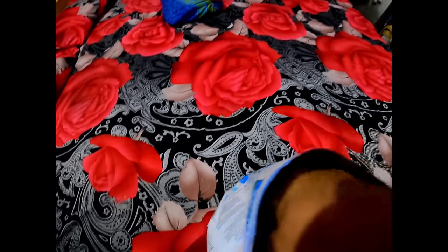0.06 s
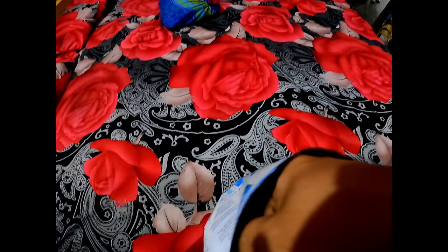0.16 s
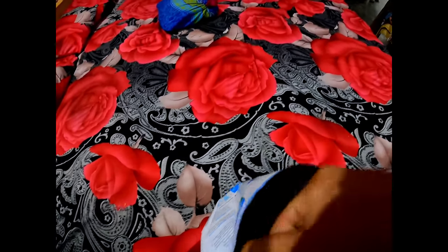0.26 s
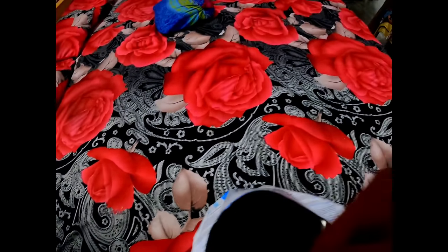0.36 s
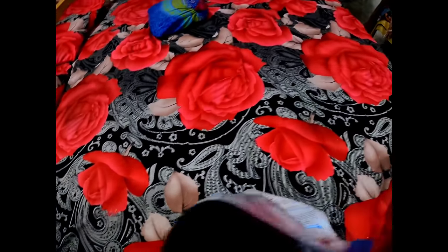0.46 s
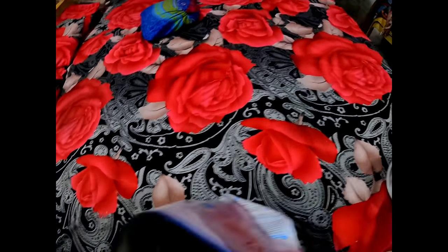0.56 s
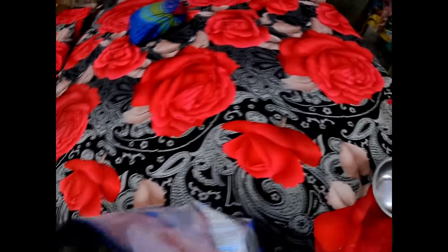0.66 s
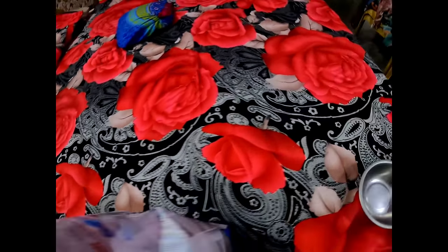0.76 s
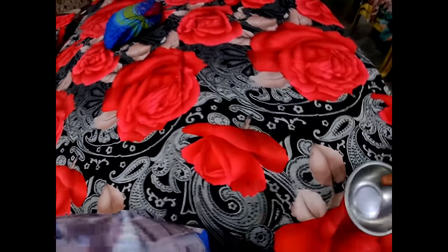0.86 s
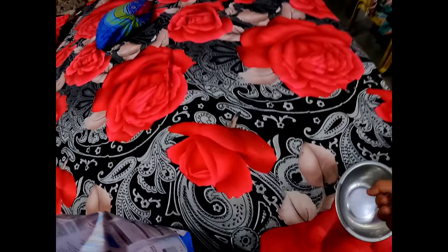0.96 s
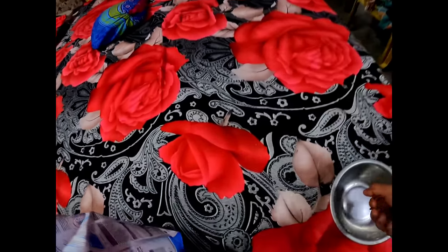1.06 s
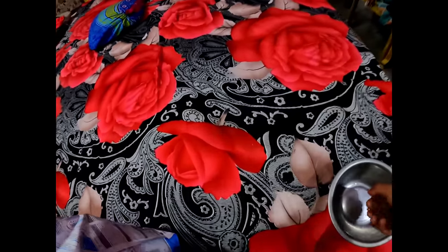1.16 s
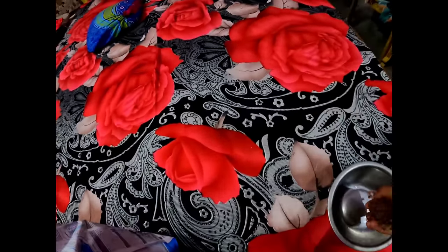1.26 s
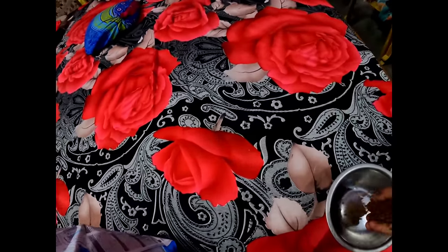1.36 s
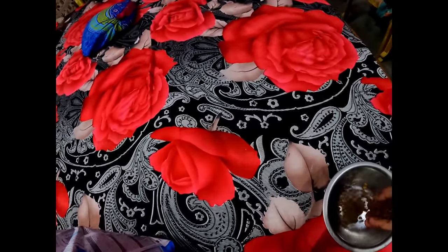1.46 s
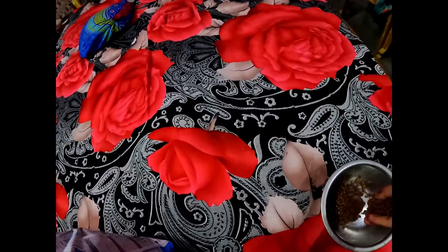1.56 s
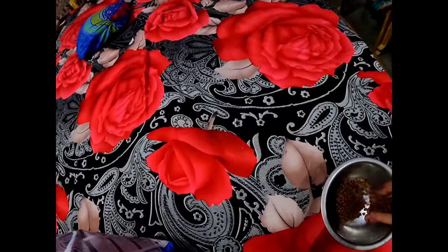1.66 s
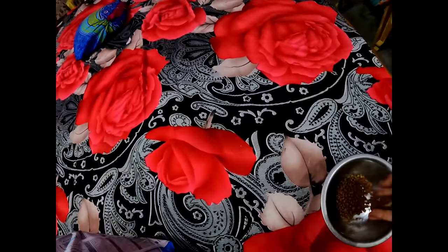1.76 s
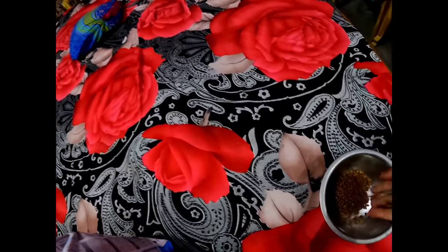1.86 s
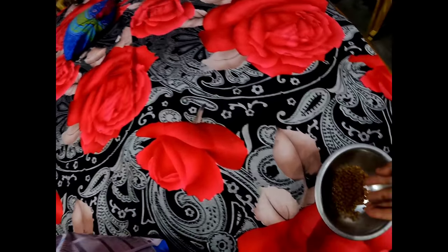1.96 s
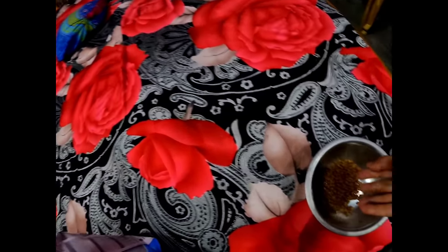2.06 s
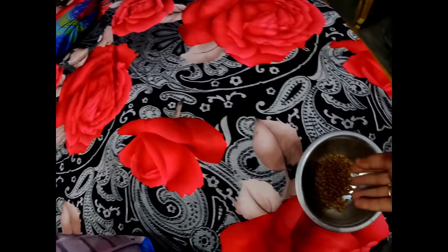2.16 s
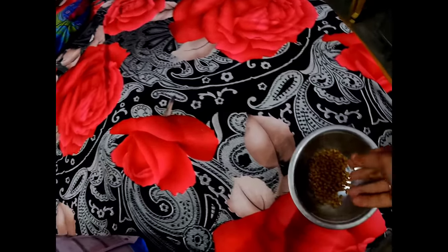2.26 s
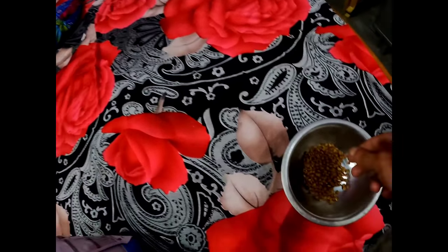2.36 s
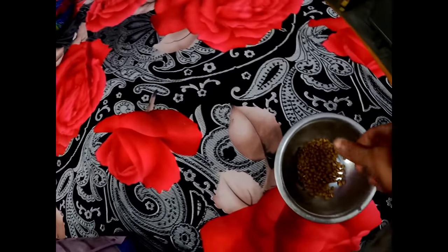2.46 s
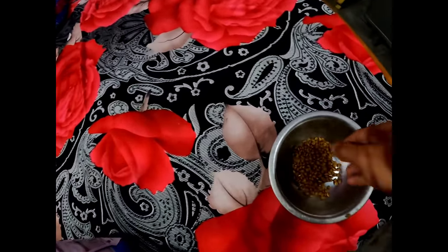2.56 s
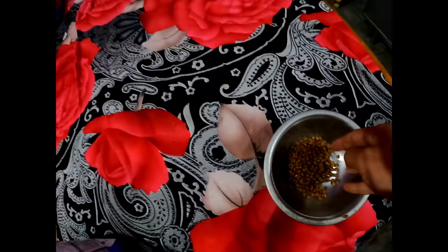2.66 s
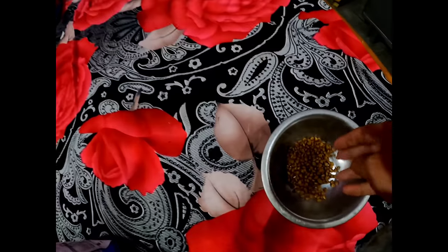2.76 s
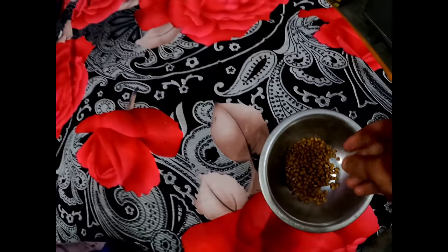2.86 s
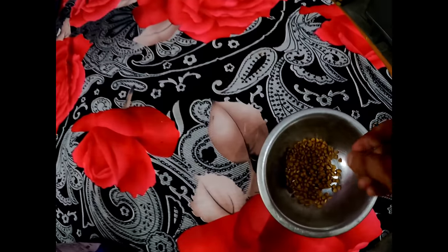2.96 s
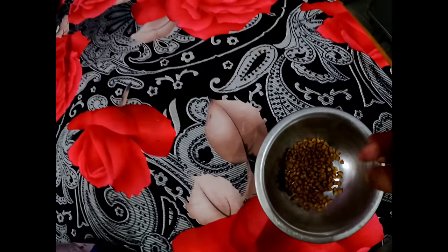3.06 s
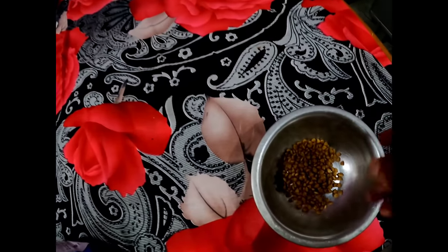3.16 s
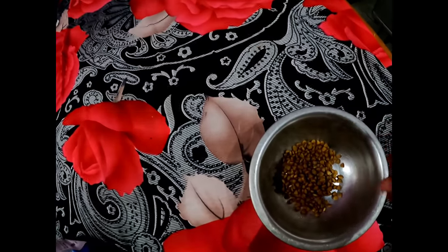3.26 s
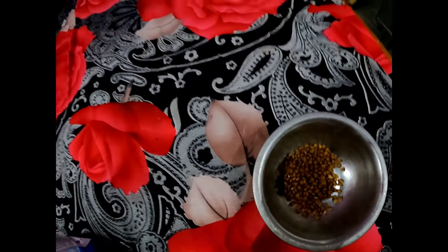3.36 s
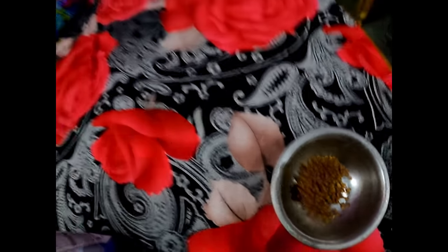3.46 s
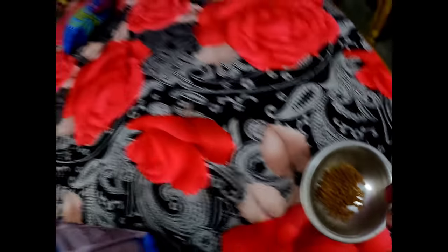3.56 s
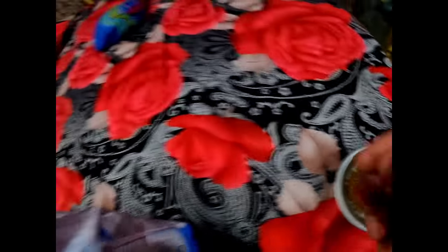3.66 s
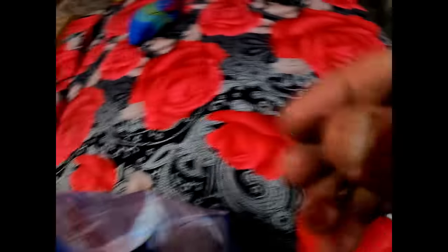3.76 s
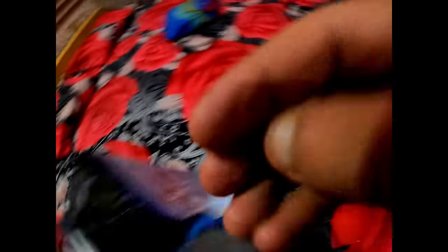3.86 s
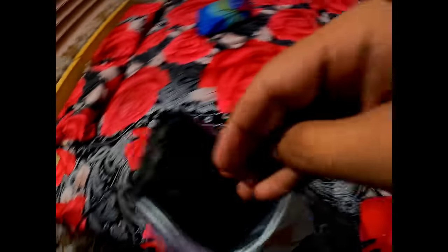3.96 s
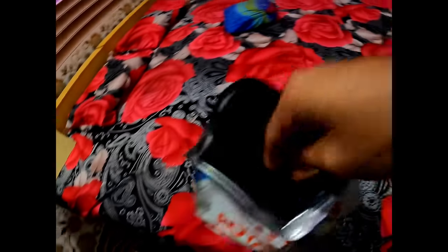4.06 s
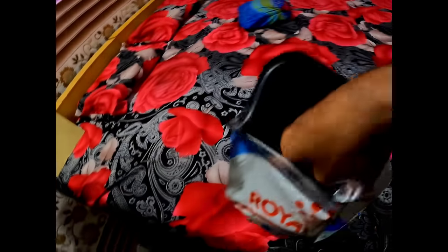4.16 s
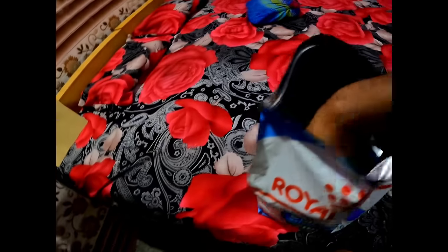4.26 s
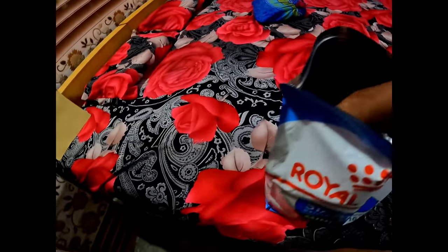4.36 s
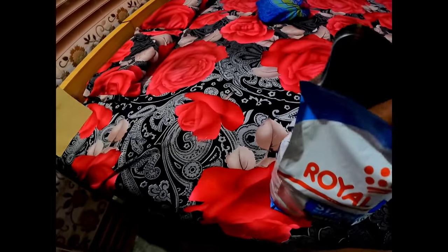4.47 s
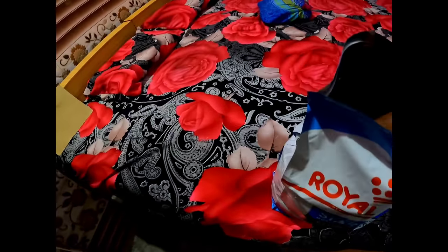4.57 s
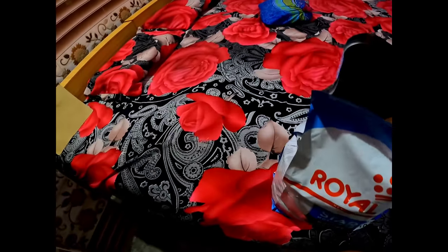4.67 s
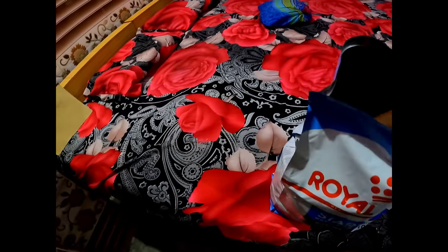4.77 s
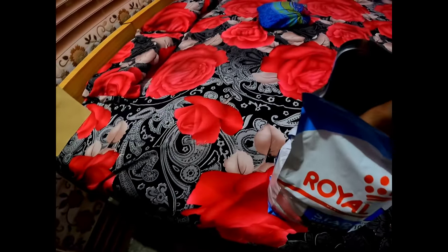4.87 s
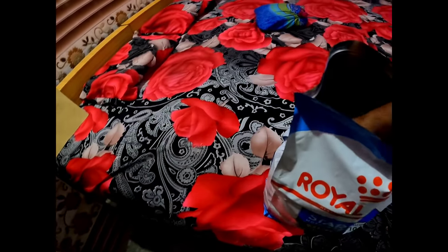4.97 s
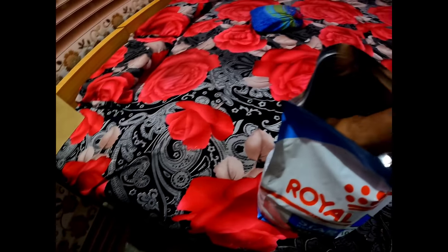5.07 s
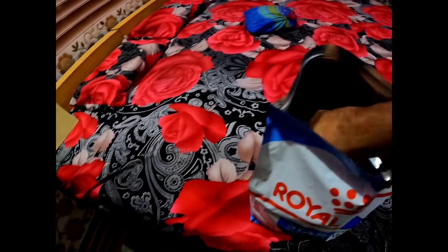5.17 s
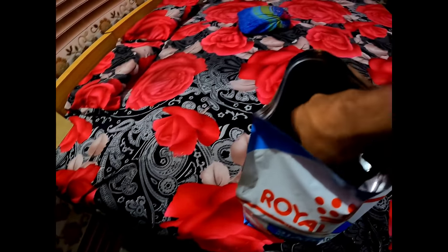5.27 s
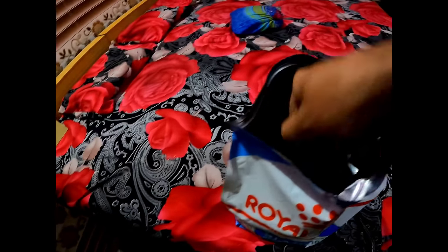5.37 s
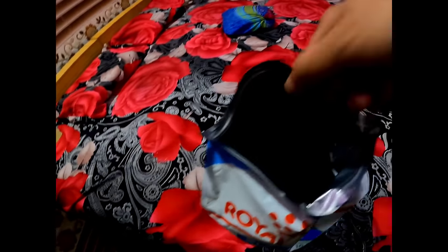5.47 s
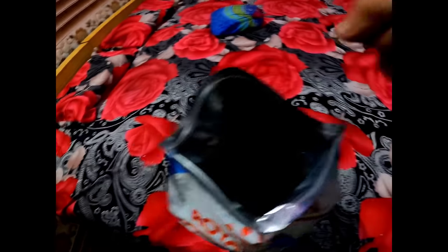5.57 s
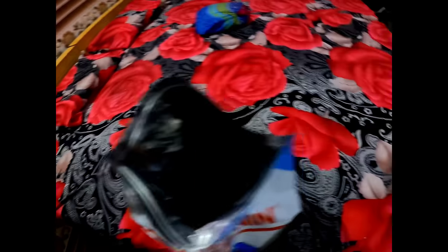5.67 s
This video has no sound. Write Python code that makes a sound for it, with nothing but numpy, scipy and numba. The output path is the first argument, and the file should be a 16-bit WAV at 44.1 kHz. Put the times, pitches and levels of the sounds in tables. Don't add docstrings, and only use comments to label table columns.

```python
import sys
import numpy as np
from scipy import signal
from scipy.fft import rfft, irfft
from scipy.io import wavfile
from numba import njit

SR = 44100
rng = np.random.default_rng(int(sys.argv[2]) if len(sys.argv) > 2 else 0)


def dump(signal):
    limited = np.clip(np.atleast_2d(signal).T, -1, 1)
    pcm = np.round(limited * 32767).astype(np.int16)
    wavfile.write(sys.argv[1], SR, pcm)


def elevation(decibels):
    levels = np.asarray(decibels, float)
    return 10 ** (levels / 20)


N = 252252
TIME = np.arange(N) / SR


def unit(x):
    return x / np.sqrt(np.mean(x ** 2))


def noise():
    return rng.standard_normal(N)


def colour(x, points):
    hz, db = np.transpose(points)
    bins = np.maximum(np.arange(len(x) // 2 + 1) * SR / len(x), 1)
    gain = elevation(np.interp(np.log(bins), np.log(hz), db))
    return irfft(rfft(x) * gain, len(x))


def band(x, lo_hz, hi_hz):
    return signal.sosfilt(signal.butter(3, [lo_hz, hi_hz], "bandpass", fs=SR, output="sos"), x)


def decay(t, t60):
    return np.exp(-np.log(1000) * t / t60)


def ring(s, size, hz, t60):
    at, out = (np.asarray(s) * SR).astype(int), np.zeros(N)
    first, last = at.min(), min(at.max() + int(t60 * SR), N)
    r, w = decay(1 / SR, t60), 2 * np.pi * hz / SR
    blows = np.bincount(at - first, size, last - first)[:last - first]
    out[first:last] = signal.lfilter([0, np.sin(w)], [1, -2 * r * np.cos(w), r * r], blows)
    return out


@njit
def grains(s, size, hz, t60):
    out = np.zeros(N)
    for k in range(len(s)):
        turn = np.exp(complex(-np.log(1000) / (t60[k] * SR), 2 * np.pi * hz[k] / SR))
        z, start = size[k] + 0j, int(s[k] * SR)
        for j in range(start, min(start + int(t60[k] * SR), N)):
            out[j] += z.imag
            z *= turn
    return out


def cluster(s, db, hz, t60, spread, count):
    u = rng.standard_normal((len(s), count, 3))
    fan = np.linspace(-1, 1, count) + 0.094 * u[..., 0]
    pitch = hz[:, None] * np.exp(np.abs(spread)[:, None] * fan)
    pitch = np.clip(pitch, 60, 0.36 * SR)
    start = s[:, None] + 0.014 * t60[:, None] * np.abs(u[..., 1])
    polarity = np.sign(u[:, :1, 2])
    size = elevation(db[:, None] - 21.3 * fan ** 2) * polarity * 0.79 / np.sqrt(count)
    return grains(start.ravel(), size.ravel(), pitch.ravel(), np.repeat(t60, count))


def crackle(rate, scatter_db, smear_s):
    hits = (rng.random(N) < rate / SR) * elevation(scatter_db * rng.exponential(size=N))
    envelope = signal.lfilter([1], [1, -np.exp(-1 / (smear_s * SR))], hits)
    return unit(envelope * noise())


def tail(s, size, points, t60):
    t = TIME[:SR // 5]
    out = 0
    for zone in range(4):
        fading = unit(colour(rng.standard_normal(len(t)), points)) * decay(t, t60)
        blows = np.bincount((s[zone::4] * SR).astype(int), size[zone::4], N)
        out = out + signal.oaconvolve(blows, fading)[:N]
    return out


def swells(table):
    s, db, rise, fall, other_db = np.transpose(table)[..., None]
    t = TIME[::SR // 1000]
    shape = db - 20 * np.maximum((s - t) / abs(rise), (t - s) / abs(fall))
    layers = (shape, shape + other_db)
    return np.array([np.interp(TIME, t, np.linalg.norm(elevation(x), axis=0)) for x in layers])


# (frequency [Hz], level [dB per Hz])
ROOM_TONE = [(26, 0.5), (45, -3.5), (65, -1.5), (228, -7.5), (880, -7), (1130, -8.5), (1240, -6.5),
             (2190, -18.5), (4140, -18), (14900, -28.5), (16000, -31)]


def room_tone():
    return elevation(-66) * unit(colour(noise(), ROOM_TONE))


def rumble():
    points = [(15, -16.0), (40, -30.5), (120, -25.0), (1000, -40.0), (15000, -37.0)]
    return elevation(-78.0) * unit(colour(noise(), points))


# (time [s], peak [dB], frequency [Hz], t60 [s])
KNOCK = (.7665, -34, 1085, .035)


def knock():
    s, db, hz, t60 = KNOCK
    return ring([s], [elevation(db)], hz, t60)


# (peak time [s], wall level [dB], rise [s], fall [s], boom minus wall [dB])
FLAPS = [(.005, -58.5, 0.0092, 0.094, -7.5), (.23, -60.5, 0.053, 0.47, 0), (.39, -53.5, 0.23, 0.043, -2.5),
         (.47, -60.5, .05, 0.097, 4), (.595, -47.5, 0.015, 0.13, -24), (.75, -67.5, .2, 0.69, -12),
         (.97, -63.5, 0.18, 0.31, -1.5), (3.76, -72.5, .05, .5, -7), (3.97, -73, 0.093, 0.11, 6),
         (4.327, -54, 0.011, 0.093, -10), (4.37, -51, 0.036, 0.15, 6.5), (4.5, -53.5, 0.23, 1, -18),
         (4.7, -64, 0.093, 0.096, 14), (4.8, -79.5, .25, 0.32, 18), (4.875, -49.5, 0.02, 0.35, -34),
         (5.05, -77, 0.12, 0.99, 1), (5.39, -68.5, .03, 0.44, 7), (5.58, -49.5, 0.11, 0.042, -12),
         (5.61, -60, 0.055, 0.13, 3)]
# (frequency [Hz], level [dB per Hz])
WALL_COLOUR = [(120, -12.5), (200, -10.5), (330, -2.5), (737, -1), (957, -5), (1270, -8.5), (1460, -10),
               (2200, -35.5), (2860, -47), (4840, -120)]


def flaps():
    wall_gain, boom_gain = swells(FLAPS)
    wall = unit(colour(crackle(370, scatter_db=1.9, smear_s=0.044), WALL_COLOUR))
    boom = unit(band(noise(), 95, 253))
    return wall_gain * wall + boom_gain * boom


# (peak time [s], film level [dB], rise [s], fall [s], sizzle minus film [dB])
RUSTLES = [(.046, -79, 0.071, 0.025, 10.5), (.212, -68.5, 0.053, 1, -3.5), (.45, -60.5, 0.098, 0.14, -3.5),
           (.58, -56, 0.0048, 0.07, -13), (.62, -65, .03, 0.17, -10), (.775, -61, 0.027, 0.25, -4.5),
           (.976, -66, 0.048, 0.42, -28), (1.385, -61.5, 0.41, 0.0073, -1.5), (3.55, -74, 0.21, .25, -8.5),
           (3.766, -69.5, 0.022, 0.3, -7), (3.97, -60.5, 0.032, 0.14, -6), (4.15, -80.5, 0.32, .3, -7),
           (4.356, -51.5, 0.037, 0.043, -3.5), (4.42, -57.5, 0.081, 0.31, 1.5), (4.66, -60, 0.39, 0.24, -4),
           (4.88, -59.5, 0.016, 0.32, -5.5), (5.2, -78.5, 1, 1, 7.5), (5.39, -66, 0.091, 0.39, -5),
           (5.562, -57, 0.017, 0.023, 8), (5.6, -61.5, 0.081, 0.18, -7.5)]
# (frequency [Hz], level [dB per Hz])
FILM_COLOUR = [(1120, -11), (1900, -1), (2020, -3), (3280, -6.5), (4150, -3), (5600, -21.5), (7280, -10.5),
               (12300, -120)]


def rustles():
    film_gain, sizzle_gain = swells(RUSTLES)
    film = unit(colour(crackle(1900, scatter_db=-1.5, smear_s=0.0052), FILM_COLOUR))
    fine = crackle(1400, scatter_db=1.5, smear_s=0.003)
    sizzle = unit(colour(fine, [(3600, -19.0), (4700, -3.5), (8000, -7.5), (15500, -17.5)]))
    return film_gain * film + sizzle_gain * sizzle


# (peak time [s], level [dB], rise [s], fall [s], unused level [dB])
SCRAPE = [
    (5.535, -66, .03, .05, 0),
    (5.566, -52, 0.04, 0.046, 0),
    (5.6, -72, .03, .1, 0),
]


def scrape():
    return swells(SCRAPE)[0] * unit(band(crackle(2800, scatter_db=-1.0, smear_s=0.002), 3500, 4700))


# (time [s], peak [dB], frequency [Hz], pitch spread [0-1])
THUDS = [(.206, -43.5, 600, 0.1), (0.229, -35, 557, 0), (.422, -40.5, 1423, 0.4), (.452, -38.5, 546, 0.5),
         (0.579, -26.5, 474, 0.24), (.951, -42, 740, 0.15), (0.959, -42, 530, 0), (2.373, -52, 346, 0),
         (2.393, -50, 433, .6), (2.437, -52, 350, .02), (3.972, -44, 1210, 0.37), (4.344, -39, 520, 0.4),
         (4.353, -22.5, 710, 0.45), (4.366, -26, 227, 0.57), (4.399, -31, 415, 0.45), (4.59, -35.5, 280, 0),
         (4.588, -34.5, 730, 0.13), (4.692, -31.5, 215, 0.25), (4.86, -37, 600, 0.2),
         (4.875, -31.5, 644, 0.42), (4.899, -33, 885, 0.23), (4.968, -33.5, 756, 0.27),
         (5.005, -40.5, 818, 0.27), (5.035, -40.5, 610, 0.55), (5.195, -45, 505, 0.4),
         (5.22, -54, 600, .15), (5.313, -51, 703, 0), (5.332, -51.5, 880, 0.04), (5.409, -54, 790, .3),
         (5.444, -54, 700, 0.2), (5.567, -41, 416, 0.2), (5.579, -49, 390, 0.4), (5.594, -47, 400, .4),
         (5.611, -48, 259, 0.4), (4.889, -39, 790, 0.3), (4.917, -29.5, 720, 0.13),
         (4.944, -31.5, 700, 0.12), (5.120, -44, 720, 0), (5.165, -39, 650, 0.38), (5.249, -47, 760, 0.08),
         (5.386, -42, 425, 0.3), (5.395, -37.5, 710, 0.36), (5.4372, -38.5, 800, 0.25),
         (5.508, -35, 770, 0.41), (5.515, -40, 255, 0.42)]


def thuds():
    s, db, hz, spread = np.transpose(THUDS)
    thump = cluster(s, db, hz, np.full(len(s), 0.0403), spread, count=5)
    return thump + elevation(-10.0) * tail(s, elevation(db), WALL_COLOUR, 0.083)


# (time [s], peak [dB], frequency [Hz])
TICKS = [(0.163, -39, 5670), (0.193, -39, 6860), (.2064, -63, 4210), (0.2299, -39.5, 4200),
         (0.4237, -32.5, 3200), (0.4531, -28, 4310), (0.473, -41, 5300), (0.5772, -34, 3160),
         (0.7668, -38, 3760), (1.0864, -62, 4100), (2.4378, -40.5, 3930), (3.9635, -50, 4240),
         (3.971, -47, 4150), (4.323, -50, 3560), (4.334, -33, 3850), (4.354, -22.5, 4270),
         (4.5884, -39, 4000), (4.8623, -44.5, 4330), (4.885, -37, 4400), (4.964, -43, 4450),
         (5.1646, -43.5, 4700), (5.385, -46, 4300), (5.3916, -62, 3820), (5.437, -45, 3960),
         (5.5087, -43, 5240), (5.565, -37, 4340), (4.868, -40, 4280), (4.9, -43, 4040), (5.036, -47, 3500),
         (5.076, -46.5, 4300)]


def ticks():
    s, db, hz = np.transpose(TICKS)
    snap = cluster(s, db, hz, np.full(len(s), 0.009), np.full(len(s), 0.66), count=7)
    return snap + elevation(-40.0) * tail(s, elevation(db), FILM_COLOUR, 0.029)


def bag():
    return flaps() + rustles() + scrape() + thuds() + ticks()


# (peak time [s], bright level [dB], rise [s], fall [s], skin minus bright [dB])
BRUSH = [
    (2.598, -45.5, 0.002, 0.17, -9),
    (2.621, -36.5, .008, 0.089, -16),
    (2.79, -65.5, 0.32, 0.28, 9),
    (2.832, -56.5, .012, 0.091, -2),
    (2.893, -64, .03, 0.16, -6),
    (3.008, -64, 0.034, 0.11, -6),
]
# (frequency [Hz], level [dB per Hz])
BRUSH_COLOUR = [(4820, -38), (8200, -8), (9070, 0), (10800, -9), (12700, -12), (14200, -24), (15500, -25)]


def brush():
    top, skin = swells(BRUSH)
    grate = unit(colour(crackle(1900, scatter_db=1.7, smear_s=0.0026), BRUSH_COLOUR))
    bright = band(grate, 8700, 10200)
    bright = bright + (top / elevation(-37)) ** 0.15 * band(grate, 10150, 13000)
    bright = bright + (top / elevation(-38.0)) ** 0.35 * band(grate, 14000, 18000)
    return top * bright + elevation(-6.0) * skin * unit(band(noise(), 1070, 6100))


# (time [s], level [dB])
RIM_HITS = [
    (2.621, -44),
    (2.7245, -55.5),
    (2.833, -69),
]
# (frequency [Hz], level [dB], t60 [s])
RIM = [(1890, -12, .45), (2977, -9, .55), (3924, -3, .2), (4457, -14, .25), (4640, -14, .3),
       (5350, -20, .3), (5916, -15, .4), (6320, -11, .7), (6600, -17, .9), (6745, -16, 1.15),
       (7214, -13, .8), (7730, -14, .8), (8258, -13, .75), (8403, -14, .6), (8753, -7, .5), (9114, 0, .15),
       (9302, -6, .4), (9787, -4, .26), (10030, -9, .35), (10450, -9, .3)]


def rim():
    hits, hit_db = np.transpose(RIM_HITS)
    song = 0
    for hz, db, t60 in RIM:
        song = song + ring(hits, elevation(hit_db + db - 4), hz, t60)
        song = song + ring(hits + 0.003, elevation(hit_db + db - 6), hz + 14, t60)
    return song


def bare(s):
    return np.clip(1 - (s - 1.55) / 0.45, 0.15, 1)


# (frequency [Hz], width [Hz], level [dB])
STEEL = [(1680, 85, -7), (2066, 34, -3), (2310, 46, -12), (3230, 190, -10), (3990, 82, -12),
         (4315, 115, -8), (4510, 36, -12), (5320, 36, -16), (5615, 44, 1), (5970, 48, -12), (6810, 66, -11),
         (7210, 41, -6), (7460, 34, -10), (8940, 48, -5), (9410, 120, -5), (9920, 26, -9), (10100, 52, -4),
         (10500, 62, -9), (11300, 94, 0), (12300, 190, -10), (12800, 120, -11), (13200, 120, -11),
         (13600, 130, -10), (13900, 36, -11), (14200, 94, -13)]


def steel(s, middle, top, damping, even=0):
    place = even + np.sqrt(1 - even ** 2) * rng.standard_normal((len(s), len(STEEL), 2))
    out = 0
    for k, (hz, width, db) in enumerate(STEEL):
        drive = elevation(0.5) * top if hz > 8000 else middle
        size = drive * elevation(db) * width / 8
        for j in range(2):
            split_hz = hz + (j - 0.5) * width * 0.33
            out = out + ring(s, size * place[:, k, j], split_hz, 1.74 / (width * damping))
    return out


# (frequency [Hz], level [dB per Hz])
SHIMMER = [(4410, -43.5), (7500, 2), (8070, -13), (8970, 4.5), (9450, -9.5), (11100, 5.5), (11700, 0.5),
           (15500, -15.5)]


def shimmer(s, size, t60):
    return tail(s, size, SHIMMER, t60)


# (frequency [Hz], width [Hz], level [dB])
HOLLOW = [(864, 280, -2.5), (920, 490, -1), (1090, 230, -2.5), (1314, 160, -7), (1924, 260, -0.5)]


def hollow(s, size, even=0):
    place = even + np.sqrt(1 - even ** 2) * rng.standard_normal((len(s), len(HOLLOW)))
    lift_db = 2.5 * (1 - bare(s))
    tones = 0
    for k, (hz, width, db) in enumerate(HOLLOW):
        gain = elevation(db + lift_db * np.log2(hz / 1100)) * np.sqrt(width)
        tones = tones + ring(s, size * place[:, k] * gain, hz, 3.48 / width)
    return band(tones, 826, 1765)


# (time [s], bright crack [dB], dull crack [dB], hollow [dB])
PELLETS = [(1.3944, -31, -32.5, -48), (1.4033, -30.5, -25.5, -35), (1.4177, -27, -24.5, -33),
           (1.4285, -22.5, -45, -50), (1.436, -35, -27, -41), (1.444, -27, -27, -40),
           (1.455, -38, -26, -45), (1.4776, -34, -22, -38), (1.4845, -36, -23.5, -33),
           (1.5016, -26, -23, -32), (1.529, -19.5, -18.5, -21.5), (1.5389, -21, -38, -41),
           (1.556, -23.5, -29, -29), (1.565, -25.5, -25.5, -29), (1.6225, -26, -42, -47),
           (1.6265, -31, -21, -47), (1.6457, -23, -46, -42), (1.668, -24, -38, -24), (1.678, -21, -27, -38),
           (1.703, -26, -42, -32), (1.7211, -26.5, -41, -35), (1.751, -22, -40, -35),
           (1.772, -39, -25.5, -31), (1.789, -42, -36, -27), (1.802, -30.5, -28, -39),
           (1.824, -36, -30.5, -37), (1.837, -27, -50, -53), (1.8533, -24.5, -37, -26.5),
           (1.869, -38, -27, -38), (1.8797, -22, -20.5, -28), (1.902, -36, -43, -29),
           (1.910, -27, -37, -37), (1.9185, -29, -21, -26), (1.9535, -38, -27, -38),
           (1.967, -28.5, -39, -35), (2.012, -37, -29, -46), (2.021, -34, -46, -62),
           (2.0508, -27, -23.5, -42), (2.075, -25, -24.5, -34.5), (2.119, -41, -50, -67),
           (2.130, -48, -38, -47), (2.149, -40, -39, -50), (2.1605, -42, -34.5, -67),
           (2.1673, -43, -41, -41.5), (2.1854, -45, -41, -68), (2.2227, -41.5, -37, -68),
           (2.2345, -61, -45, -54)]
# (time [s], bright crack [dB], dull crack [dB], hollow [dB])
CRUMBS = [(2.2659, -46, -32.5, -42), (2.2888, -34, -28, -47.5), (2.2863, -47, -34, -51),
          (2.292, -35, -41, -55), (2.3115, -41, -38, -64), (2.33, -38, -48, -67), (2.3372, -53, -39, -42.5),
          (2.373, -50, -48, -58), (2.3945, -62, -34.5, -40.5), (2.438, -58, -50, -69),
          (2.6198, -29, -55, -50), (2.725, -41, -29.5, -43), (2.802, -44, -48, -45),
          (2.8233, -52, -45, -37), (2.8341, -30.5, -33.5, -47), (2.892, -34.5, -58, -57),
          (2.9176, -39, -53, -57), (3.001, -44, -68, -77), (3.010, -44, -70, -65), (3.0162, -43, -82, -63)]


def pellets():
    s, top_db, middle_db, hollow_db = np.transpose(PELLETS + CRUMBS)
    ring_db = np.where(s < CRUMBS[0][0], -2.5, -5)
    one = np.ones(len(s))
    bright = cluster(s, top_db + 1, 11000 * one, 0.007 * one, 0.26 * one, count=7)
    dull = cluster(s, middle_db, 5400 - 600 * bare(s), 0.0041 * one, 0.52 + 0.28 * bare(s), count=9)
    middle, top = elevation(middle_db + ring_db), elevation(top_db + ring_db)
    after = elevation(-31.5) * steel(s, bare(s) * middle, bare(s) * top, 0.44, 0.65)
    after = after + elevation(-4.5) * shimmer(s, top, 0.018)
    return bright + dull + after + elevation(-26.5) * hollow(s, elevation(hollow_db), 0.81)


# (time [s], top ring level [dB])
POUR = [
    (1.385, -54),
    (1.4, -39),
    (1.44, -33),
    (1.522, -34),
    (1.535, -26.5),
    (1.688, -29.5),
    (1.8, -40),
    (1.968, -39.5),
    (2.03, -46.5),
    (2.48, -74),
]


def pour():
    pellets_per_s = 900
    u = rng.random((2200, 4))
    t, flow_db = np.transpose(POUR)
    length = t[-1] - t[0]
    s = t[0] + length * u[:, 0]
    middle_db = 5 + (1.5 - 5) * bare(s)
    hollow_db = 4 + (-2 - 4) * bare(s)
    falls = u[:, 1] < pellets_per_s * length / len(s)
    size = falls * elevation(np.interp(s, t, flow_db) - 1.63 * np.log(u[:, 2])) / np.sqrt(pellets_per_s)
    middle = size * elevation(middle_db)
    clicks = grains(s, middle * np.sqrt(1.1 - bare(s)), 2300 * 3.85 ** u[:, 3], 0.00091 + 0 * s)
    out = elevation(-9.5) * steel(s, middle * bare(s), size * bare(s), 0.69) + elevation(30.0) * clicks
    return out + elevation(16.0) * shimmer(s, size, 0.024) + elevation(-5.5) * hollow(s, size * elevation(hollow_db))


def scene():
    bowl = pour() + pellets() + rim() + brush()
    near = band(bowl, 537, 17300) + band(bag(), 125, 17480)
    t = TIME[:SR // 4]
    echoes = rng.standard_normal((2, len(t))) * decay(t, np.array([[0.2], [0.02]]))
    wet, apart = (signal.fftconvolve(near, echo / np.linalg.norm(echo))[:N] for echo in echoes)
    mid = near + elevation(-6.5) * wet + room_tone() + knock()
    apart = colour(apart, [(20, -11), (300, -20.5), (600, -4.5), (1300, -4.5), (3000, -1), (8000, 2), (15000, 8.5)])
    side = elevation(-33.5) * apart + rumble()
    return np.array([mid + side, mid - side])


def band_limit(x):
    return signal.sosfilt(signal.butter(12, 16490, fs=SR, output="sos"), x)


def record(dry):
    low_pass = signal.ellip(7, 0.2, 30, 15550, fs=SR, output="sos")
    mix = signal.sosfilt(low_pass, dry) - 0.0003
    return band_limit(mix)


dry = scene()
out = record(dry)
dump(out)
```